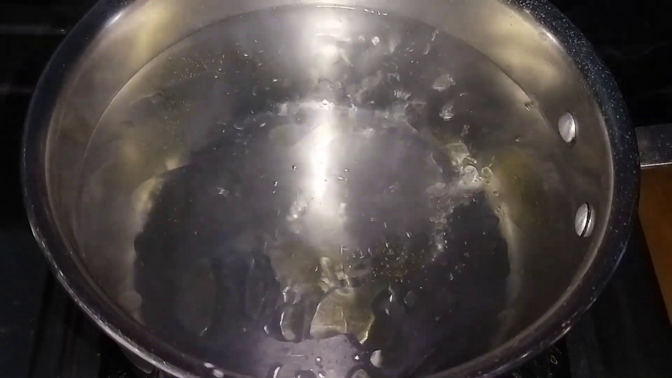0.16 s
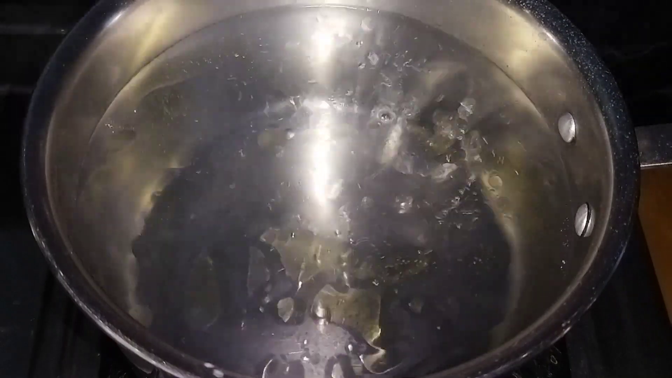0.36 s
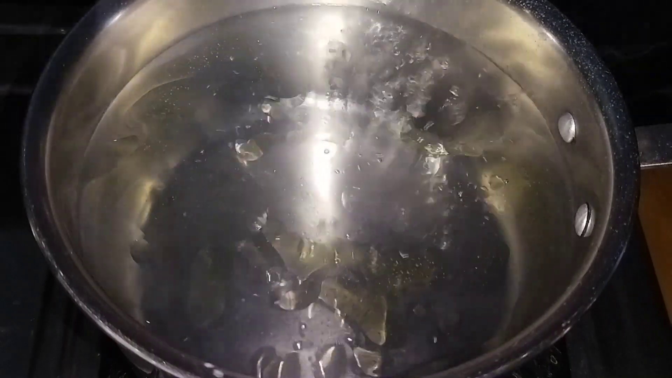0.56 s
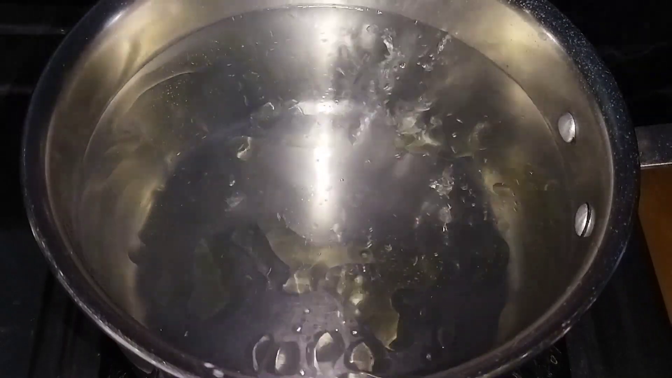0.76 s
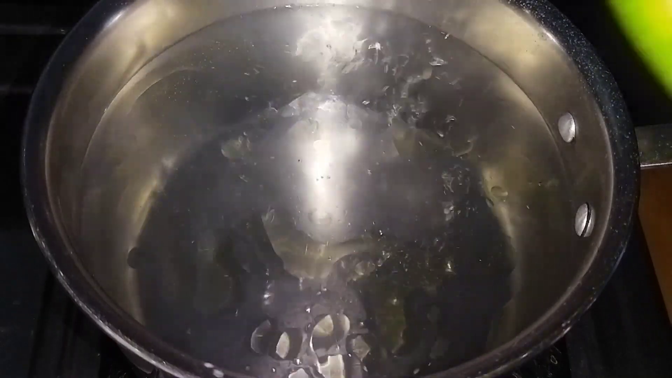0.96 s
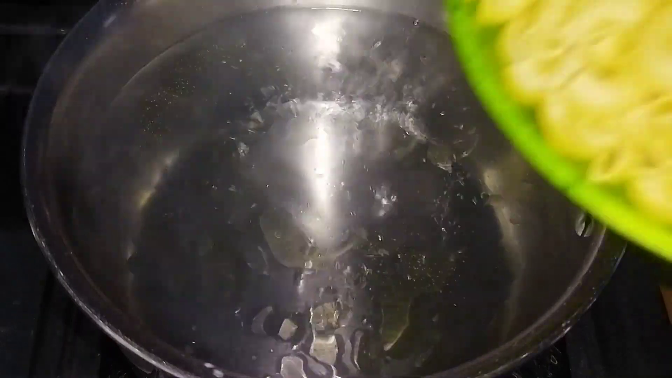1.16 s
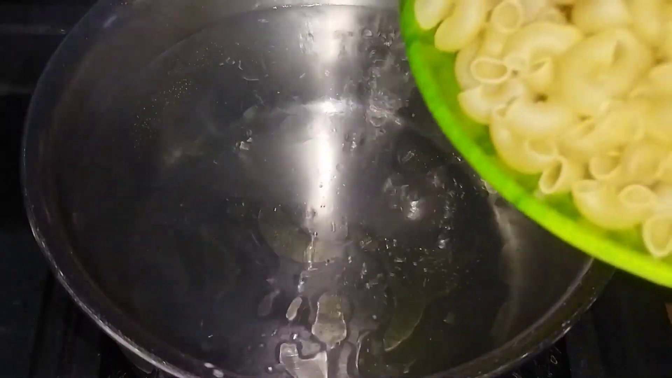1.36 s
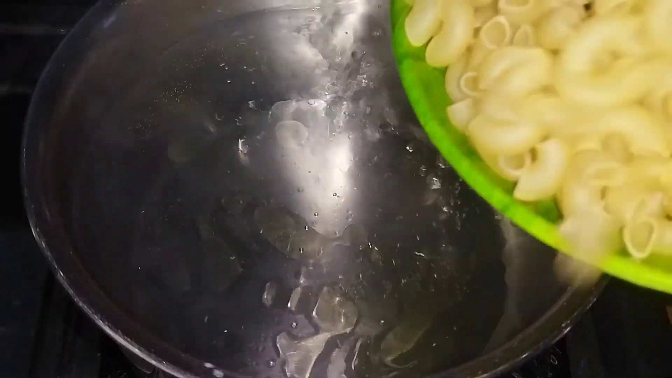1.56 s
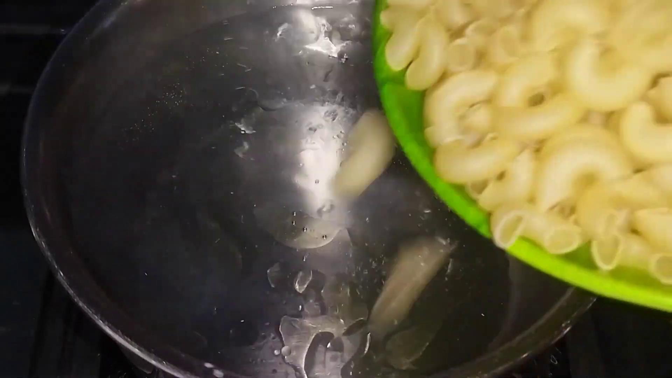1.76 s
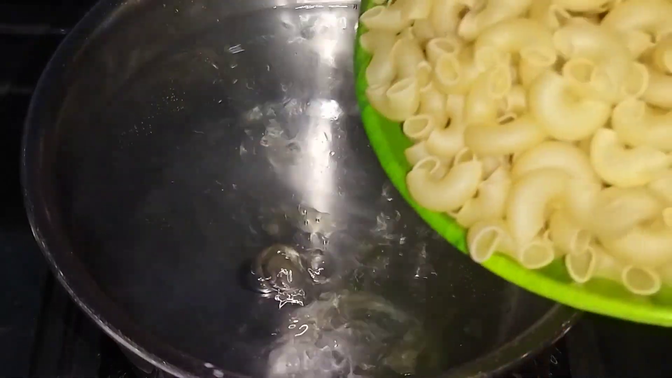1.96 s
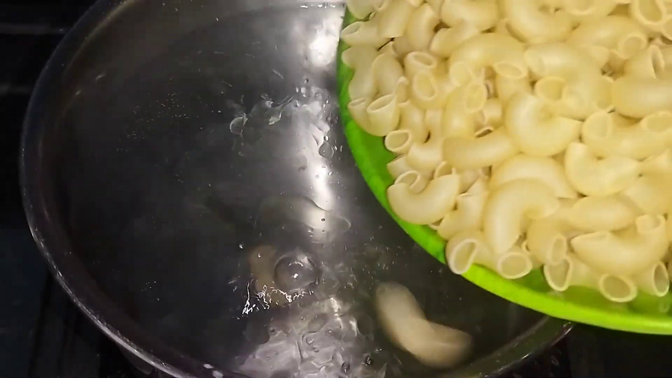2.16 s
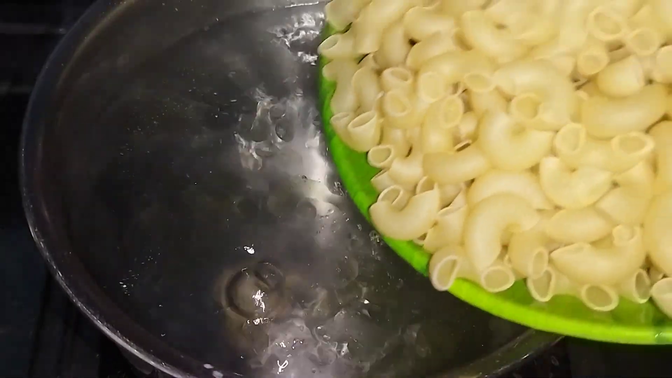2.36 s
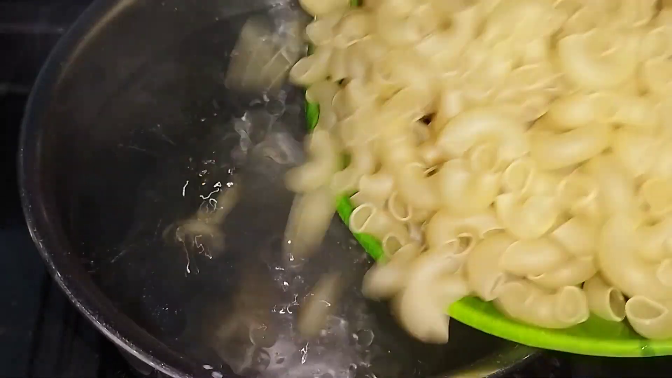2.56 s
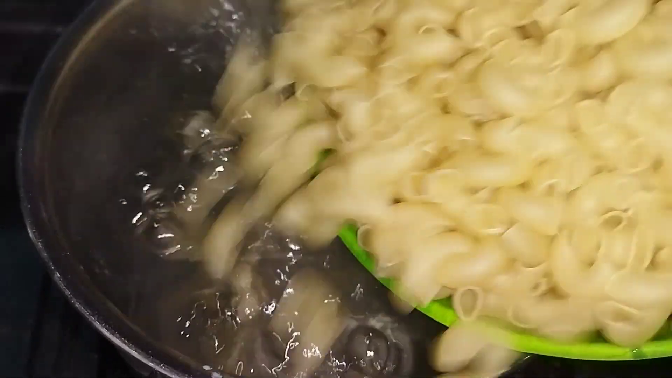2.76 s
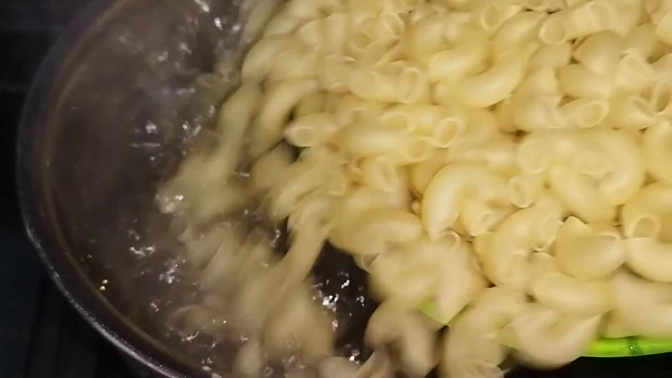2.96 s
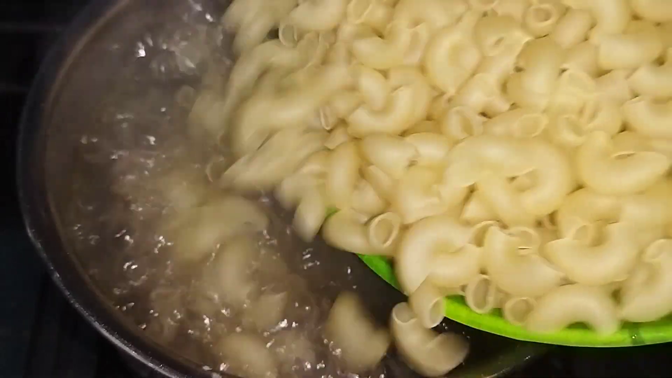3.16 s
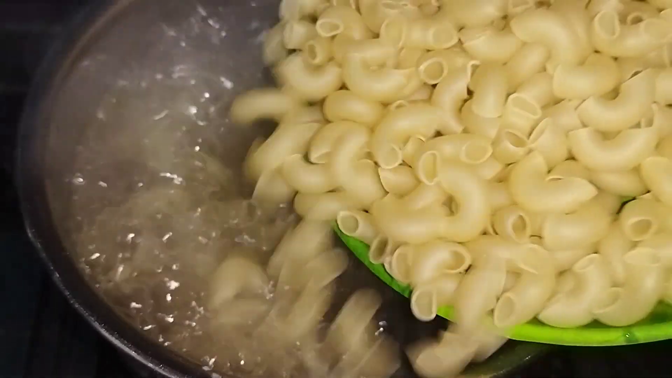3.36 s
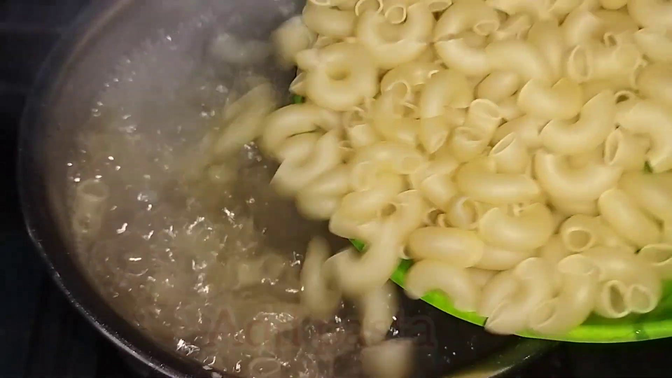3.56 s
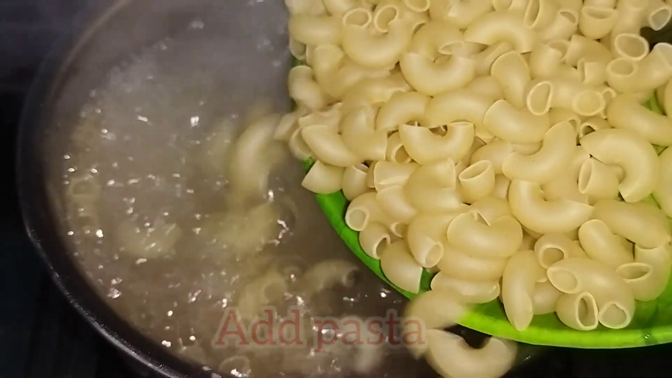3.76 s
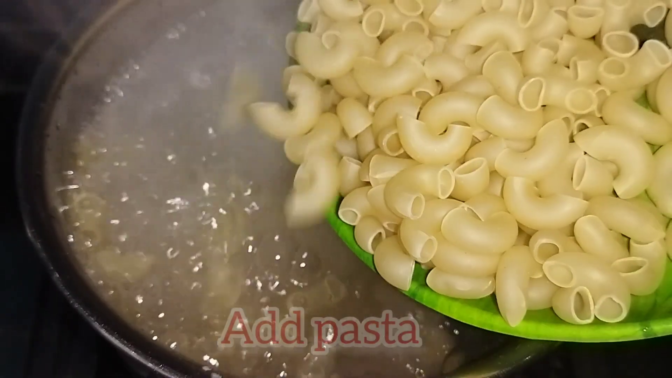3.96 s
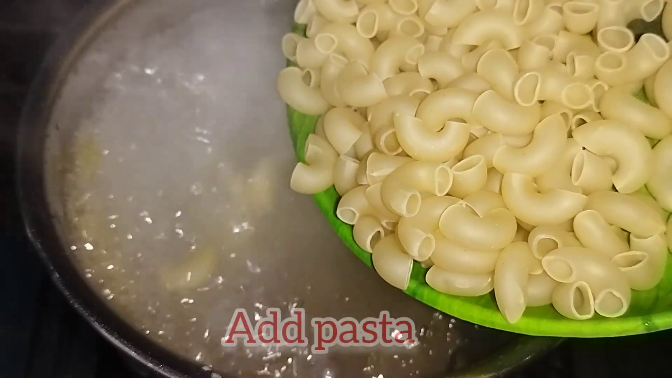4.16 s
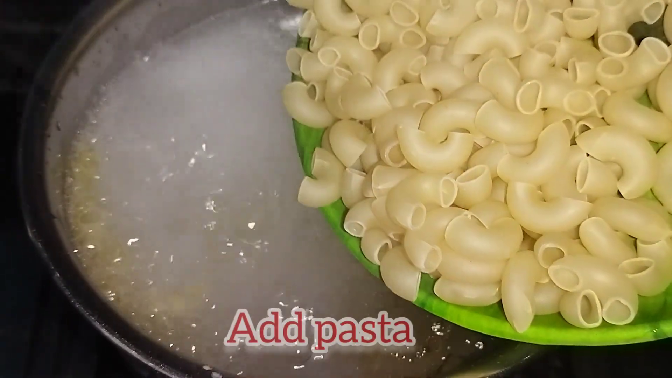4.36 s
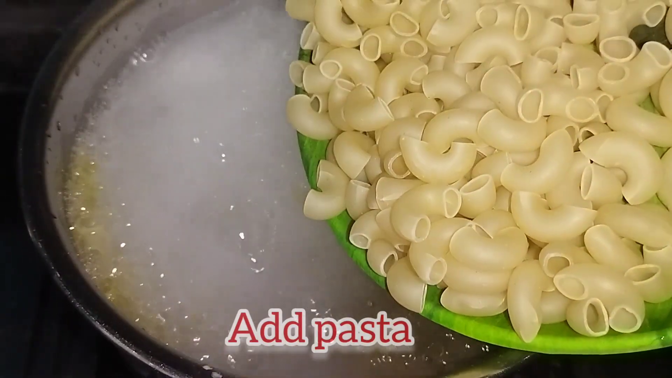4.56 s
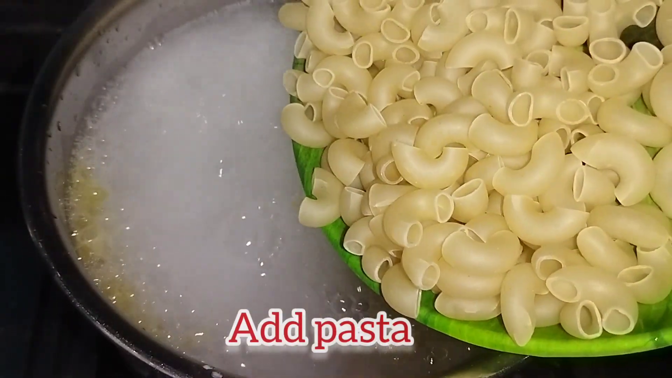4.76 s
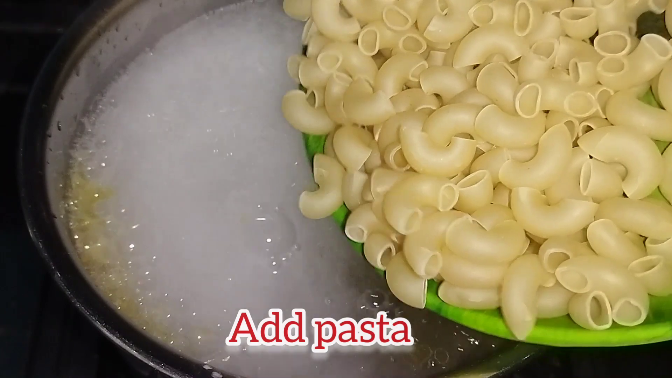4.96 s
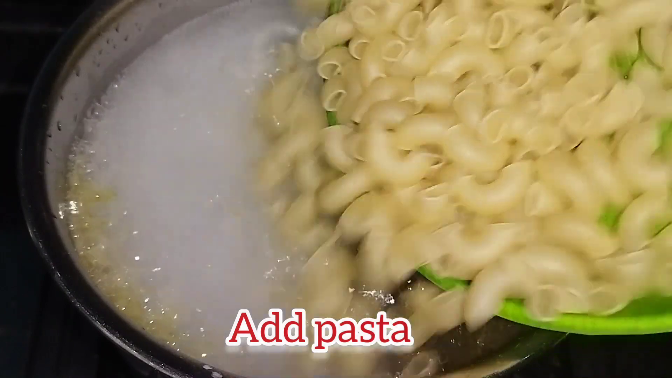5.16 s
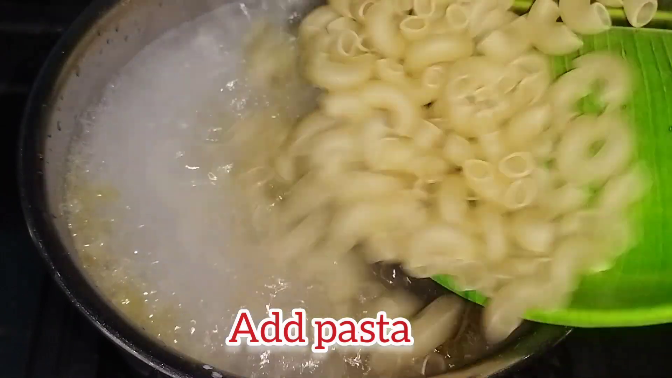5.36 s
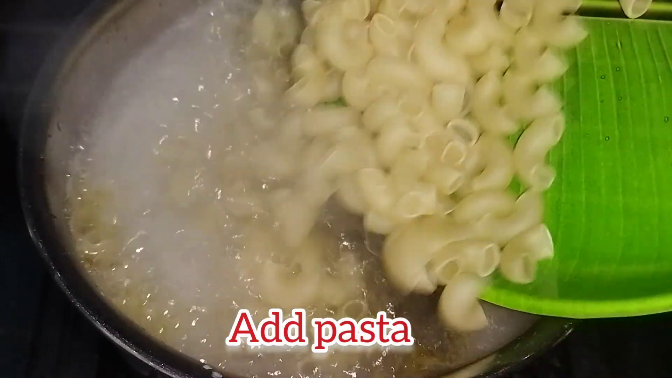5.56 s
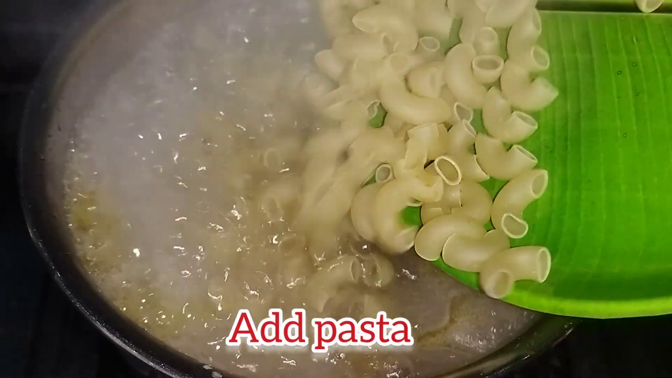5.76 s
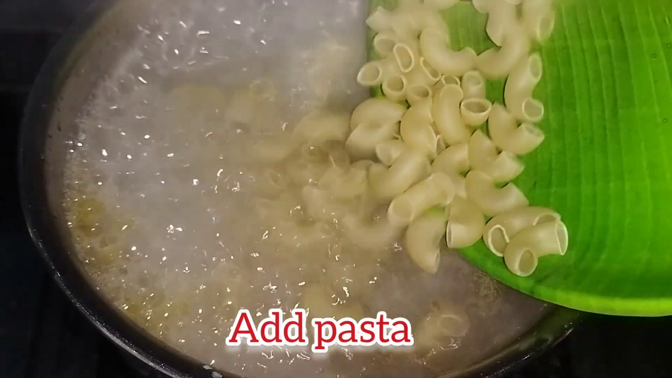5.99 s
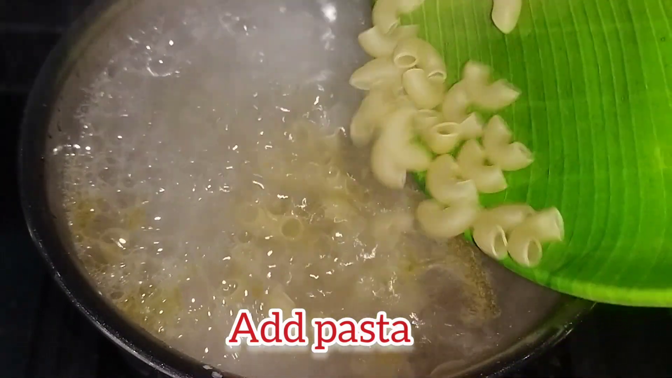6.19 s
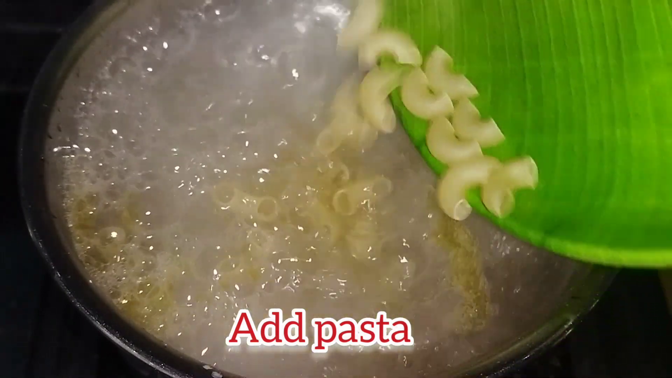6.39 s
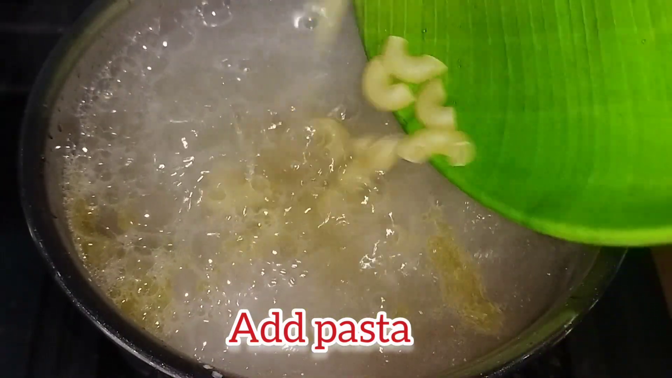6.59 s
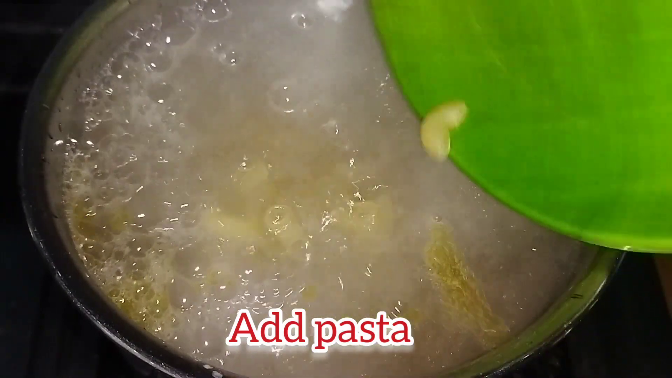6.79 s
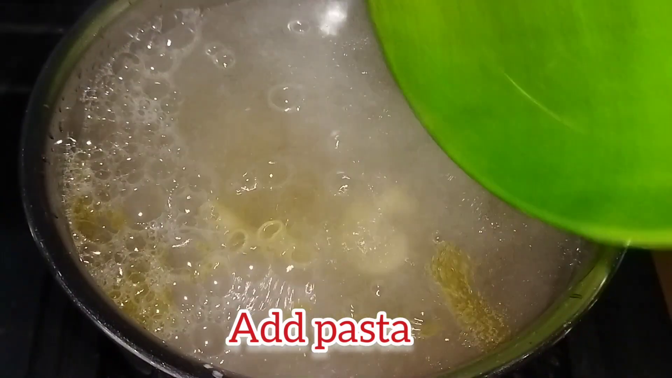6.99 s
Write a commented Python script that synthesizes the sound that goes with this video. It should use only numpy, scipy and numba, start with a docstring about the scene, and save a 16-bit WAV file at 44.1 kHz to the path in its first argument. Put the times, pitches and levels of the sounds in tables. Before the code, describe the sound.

Close stereo pickup in a small, hard-walled kitchen. A pot simmers with a low wavering hum and soft blips over quiet burner hiss. A few dry macaroni tick off a plastic plate, then a dense, bright clattering rush falls in with gurgling splashes. It pauses over fine foam fizz, a second rush follows, then last pieces tick and the plate gives a dull knock.

```python
"""In a kitchen, dry macaroni slides off a plastic plate into a steel pot of simmering water, in three bursts.
The hard tubes clatter, snap and tick by short damped modes and cracks; trapped air rings as rising bubbles.
The pot's hum, a wavering tone with narrow-band noise, and its churning die as the pasta cools the water.
Burner rumble and hiss are filtered noise, foam fizz is treble noise, a faint whistle fills a pause,
and low modes make a soft and then a stronger dull knock at the end."""
import sys
import numpy as np
from scipy import signal
from scipy.fft import rfft, irfft
from scipy.io import wavfile
from scipy.ndimage import uniform_filter1d
from numba import njit

SR = 44100
rng = np.random.default_rng(int(sys.argv[2]) if len(sys.argv) > 2 else 0)


def transcribe(signal):
    """Save signal, clipped to [-1, 1], as a 16-bit WAV file at the path in sys.argv[1]."""
    frames = np.atleast_2d(signal).T
    limited = np.clip(frames, -1, 1)
    pcm = np.round(limited * 32767).astype(np.int16)
    wavfile.write(sys.argv[1], SR, pcm)


N = 309839
T = np.arange(N) / SR  # s
TOP_HZ = 15500  # upper limit of the sound

# Levels in the tables are relative unless a comment says otherwise.
# Burner hiss spectrum: (f/Hz, spectral level/dB)
HISS_SPECTRUM = [(60, -8.5), (150, -13.5), (230, 3), (360, 0.5), (560, -11), (1100, -11), (2200, -25),
                 (4000, -33.5), (7500, -28), (9600, -15), (11200, -27), (15500, -38)]
HISS_DB = -56  # rms
# Burner rumble spectrum: (f/Hz, level/dB)
RUMBLE_SPECTRUM = [(25, -34), (45, -15), (63, -6.0), (78, -10.0), (104, 1.0), (160, -2.0), (260, -16.5),
                   (600, -45.0)]
# Flurries of steam bubbles: (t/s, level over the steady blipping/dB)
STEAM_FLURRIES = [(0.26, -4), (0.58, 4), (0.8, 2)]
FLURRY_S = 0.027
# Resonances of the churning water, each passed twice: (f/Hz, width per pass/Hz, level/dB)
CHURN_MODES = [(64, 63, -6), (118, 93, 4.5), (163.6, 20, 1.5), (346, 100, 3), (405, 204, -2)]
# Simmering noise: (f/Hz, spectral level/dB)
SIMMER_SPECTRUM = [(200, -26.5), (450, -9.5), (670, -24.5), (810, -15), (1050, -13), (1700, -12),
                   (3500, -19), (8000, -31)]
CHURN_DB = -49.5
QUENCH_S, QUENCH_DB_PER_S, QUENCH_DEPTH_DB = 4, 16, 25  # onset, rate and limit of the churn's decay
# Surges of the boiling hum: (t/s, level/dB)
HUM_SURGES = [(0, -60), (0.2, -40), (0.38, -51), (0.55, -47.5), (0.98, -53), (1.15, -49), (1.41, -40.5),
              (1.67, -60), (1.82, -44), (2.02, -48), (2.12, -46), (2.3, -54), (2.57, -50), (2.8, -54),
              (3.05, -46), (3.3, -44), (3.7, -46), (4.1, -58), (4.45, -78)]
BOIL_HZ = 283.8  # pitch about which the hum wavers
# Single sharp snaps: (t/s, peak level/dB, bass level/dB, treble level/dB, ring f/Hz)
SNAP_EVENTS = [(1.334, -30, -10, -12, 5220), (1.3615, -24.5, -23, -32, 2560),
               (1.407, -22.5, -16.5, -14, 2240), (1.438, -29.5, -22, -18, 2390),
               (1.469, -35, -32, -8, 9600), (1.492, -14, -29.5, -19, 9620), (1.603, -15.5, -23, -19, 3130),
               (1.668, -23.5, -26, -25, 9300), (1.676, -28, -28, -20, 4600), (1.687, -26, -28, -13, 4600),
               (1.707, -36, -29, -13, 3960), (1.726, -13.5, -40, -20, 4600),
               (1.7281, -12.5, -46, -21, 4830), (1.963, -23, -13, 4, 12400),
               (1.981, -11.5, -20.5, -23, 3360), (2.028, -8, -35, -12, 13800), (2.149, -20, -20, -15, 3250),
               (2.196, -25, -26, -28, 3400), (2.229, -8, -42, -5, 9320), (2.359, -26, -26, -17, 4500),
               (2.392, -21.5, -24, -18, 4700), (2.406, -18.5, -17, -13.5, 3370),
               (2.49, -18.5, -24, -18.5, 5370), (2.537, -22.5, -15, -14, 3250),
               (2.598, -19, -27, -23, 3430), (2.713, -24, -27, -22, 4800), (2.861, -15.5, -23, -23, 6560),
               (2.902, -16, -15, -11, 9200), (2.936, -8.5, -21.5, -7, 4400), (2.948, -13, -23, -28, 2440),
               (3.154, -15, -21, -20, 9600), (3.26, -13.5, -28, -9, 10700), (3.279, -11, -30, -11, 12400),
               (3.298, -5.5, -14, -10, 9700), (3.42, -13.5, -29, -9, 4380), (3.487, -11, -13, -7, 9800),
               (3.55, -7, -19.5, -8, 11160), (3.591, -11, -12, 8, 11600), (3.688, -8.5, -23, -13, 10200),
               (3.761, -10.5, -14, -6, 9500), (3.877, -9, -20, -10, 9080), (3.963, -16, -23, -25, 10000),
               (3.968, -12, -20.5, -15, 4570), (4.069, -24, -11, -15.5, 3060), (4.083, -26, -25, -17, 9600),
               (4.136, -27, -21, -16, 9700), (4.152, -12, -19, -12.5, 9750), (5.113, -23, -18, -32, 3800),
               (5.138, -22, -25, -17, 2610), (5.374, -24, -24, -23, 4600), (5.385, -9.5, -21, -15, 4550),
               (5.402, -18, -26, -18, 5270), (5.749, -13.5, -35, -14, 9770), (5.886, -18.5, -17, -7, 9400),
               (5.947, -15.5, -13, -12, 5300), (5.969, -23, -31, -17, 6670), (6.011, -21, -12, -21, 4470),
               (6.076, -20.5, -17, -9, 6550), (6.101, -21, -22, -15, 4960), (6.235, -25.5, -44, -24, 6230),
               (6.329, -16, -15, -11.5, 2680), (6.394, -25, -23, -18, 4360), (6.401, -26, -17, -19, 4370),
               (6.41, -15, -23, -17, 4420), (6.429, -26, -22, -22, 3040), (6.451, -19.5, -21.5, -22, 3530),
               (6.48, -26, -27, -12, 6440), (6.49, -15, -27, -15.5, 3500), (6.497, -16, -24, -12, 9450),
               (6.507, -21, -23, -14, 4630), (6.52, -13, -19, -4.5, 4520), (6.531, -14.5, -34, -5, 9840),
               (6.568, -16, -21, -19.5, 4360), (6.674, -27, -20, -14, 9340),
               (6.693, -5.5, -24.5, -5.5, 11820), (6.802, -26, -29, -20, 3970),
               (6.837, -28, -21, -20, 5230), (6.92, -23.5, -40, -1, 12000), (6.991, -15, -22, -12.5, 2140)]
# Partials of a ringing hollow tube: (multiple of its ring f, level/dB)
TUBE_MODES = [(1, 4), (1.33, -9), (2.15, -16)]
# Upper colouring of the snaps: (f/Hz, gain/dB)
SNAP_COLOUR = [(5000, -2.5), (5700, -4), (6600, 1), (7400, -4.5), (8300, 1.5), (9500, 4), (11200, -1.5),
               (11900, 1), (15000, -9)]
TUBE_T60_S = 0.015
SNAP_RISE_S = 0.0027  # the scuffle of a snap peaks this long after first touch
# Slides off the plate: (start t/s, swell time/s, ebb t/s, ebb rate/(dB/s), clatter level/dB,
#                        top octave level re clatter/dB, splash level re clatter/dB)
PASTA_SLIDES = [(1.36, 0.12, 1.9, 10.5, -45.5, -10, -9.5), (2.53, 0.19, 3.724, 44.5, -31, -1.5, -8),
                (4.93, 0.09, 5.52, 30, -41.5, -34, -27), (5.08, 0.067, 5.528, 21, -31, -3, -10.5),
                (6.38, 0.26, 6.75, 62, -42, 4, -3)]
SWELL_DB = 24  # a slide starts this far under its full level
HARDENING = 0.66  # extra dB of top octave per dB of flow: a fast stream collides harder
SPLASH_LAG_S, SPLASH_FOLLOW = 0.062, 0.76  # the fall to the water; dB of splash per dB of flow
# Spectrum of the sliding heap: (f/Hz, gain/dB)
HEAP_COLOUR = [(410, -35), (700, -2.5), (818, -0.5), (1060, -1), (1360, -0.5), (1780, 2), (2400, 0.5),
               (3350, 1), (4580, -0.5), (5000, -2.5), (5640, -5.5), (6590, -3), (7700, -11), (9470, 3.5),
               (11350, -6.5), (11850, 0), (12900, -6.5), (15500, -9.5)]
# Clumps that tumble at once: (t/s, level/dB)
TUMBLING_CLUMPS = [(1.732, -42), (1.985, -28.5), (2.717, -29), (2.803, -30), (2.944, -38), (3.024, -34.5),
                   (3.303, -22), (3.353, -19), (3.488, -32), (3.552, -26.5), (5.162, -34), (5.22, -40),
                   (5.699, -44), (6.497, -40)]
CLUMP_DECAY_S = 0.017  # time constant
# Spectrum of loose pieces: (f/Hz, gain/dB)
STRAY_COLOUR = [(400, -24), (1500, 9), (4000, -11), (7500, -4.0), (9500, 4), (15000, -5)]
# Spectrum of the splash: (f/Hz, gain/dB)
SPLASH_COLOUR = [(100, -17.0), (160, -6), (220, -11), (310, -0.5), (430, -0.5), (560, -1.5), (680, -4.5),
                 (880, 3.5), (1300, -5.5), (1800, -4)]
# Resonances of the pot's air and walls: (f/Hz, level/dB)
POT_RESONANCES = [(437, -1), (749, -6.5), (887, -9), (1168, -5), (1756, -6), (2743, -2), (4570, -6),
                  (6349, -3), (9380, -9)]
FOAM_START_S, FOAM_RISE_S = 1.5, 4.2  # starch foam spreads over the water
# Spectrum of the foam's fizz: (f/Hz, level/dB)
FIZZ_SPECTRUM = [(1000, -50), (7500, -16), (9500, -0.5), (11200, -11), (12200, -3.5), (15500, -12)]
# Modes of the steel wall: (f/Hz, level/dB, t60/s)
WALL_MODES = [(3320, -3, 0.053), (4568, 0.5, 0.064), (5000, 0, 0.091), (5380, -4, 0.08), (9537, 4, 0.046)]
# Pieces that strike the steel wall: (t/s, level/dB)
WALL_HITS = [(1.730, -23.5), (2.031, -42), (2.938, -29), (5.387, -34)]
# Single larger bubbles: (t/s, level/dB, starting f/Hz)
PLOP_EVENTS = [(2.419, -34.5, 840), (2.68, -35, 890), (2.71, -29.5, 776), (2.783, -25.5, 1080),
               (4.232, -31.5, 1740), (4.319, -35, 1060), (6.421, -37, 1080), (6.631, -36, 1130),
               (6.712, -38, 970), (6.752, -39, 1110)]
# Low modes of the plate: (f/Hz, level/dB, t60/s)
PLATE_MODES = [(111, -37, 0.15), (151, -28, 0.017), (204, -34, 0.22), (282, -18, 0.021), (397, -33, 0.11),
               (591, -23, 0.03), (820, -28.5, 0.047), (2200, -21.5, 0.011)]
# Dull knocks: (t/s, level/dB)
PLATE_KNOCKS = [(6.693, -14), (6.991, 1.5)]
# Reverberation time of the kitchen: (f/Hz, t60/s)
REVERBERATION = [(200, 0.83), (1500, 0.33), (5000, 0.29), (10000, 0.27), (15000, 0.29)]
# Level of the difference between the two ports: (f/Hz, gain/dB)
PORT_DIFFERENCE = [(350, -14.5), (800, -3.0), (2000, -0.5)]
# Response of each port: (f/Hz, gain/dB)
LEFT_PORT = [(200, -2.5), (2000, 0.48), (5000, 2.0), (8800, 3.0), (12000, 4.0)]
RIGHT_PORT = [(200, -3.0), (2000, -0.1), (5000, 1.4), (8800, -3.5), (12000, 3.5)]


def undb(db):
    """Amplitude ratio of a level difference in decibels."""
    return 10 ** (np.asarray(db) / 20)


def level(x, db):
    """Normalization: scale a signal to a given rms level."""
    return x * undb(db) / np.sqrt(np.mean(x ** 2))


def on_log_axis(points, hz):
    """Interpolation on a logarithmic frequency axis, as hearing spaces pitch."""
    f, value = np.transpose(points)
    return np.interp(np.log(hz + 1), np.log(f), value)


def colour(x, points, size=4096):
    """Minimum-phase filtering: a folded cepstrum makes the response to (f/Hz, gain/dB) points causal."""
    gain_db = on_log_axis(points, np.fft.rfftfreq(size, 1 / SR))
    cepstrum = irfft(np.log(undb(gain_db)))
    fold = 1 + np.sign(size / 2 - np.arange(size))
    fold[0] = 1
    response = irfft(np.exp(rfft(cepstrum * fold)))
    return signal.fftconvolve(x, response[None], axes=1)[:, :x.shape[1]]


def resonate(x, hz, width_hz):
    """Resonance: a single mode passes its own frequency with unit gain."""
    return signal.lfilter(*signal.iirpeak(hz, hz / width_hz, fs=SR), x)


def walk(rate):
    """Slow random fluctuation: smoothed random steps, rate per second, with a spread near 1."""
    k = int(SR / rate)
    steps = np.repeat(rng.standard_normal(N // k + 1), k)
    return uniform_filter1d(steps, k)[:N]


def air_noise(size=N):
    """Spatial coherence: stereo noise is alike in the bass and nearly unrelated in the treble."""
    mid, side = rng.standard_normal((2, 1, size))
    return mid + np.array([[1], [-1]]) * colour(side, PORT_DIFFERENCE)


def add(out, s, sound):
    """Superposition: mix a short stereo sound in at time s."""
    i = int(s * SR)
    out[:, i:i + sound.shape[1]] += sound[:, :N - i]


@njit
def rings(s, hz, t60, size, glide, spread):
    """Damped oscillation: sines rise by the share glide as they die, spread radians apart at the ports."""
    out = np.zeros((2, N))
    for k in range(len(s)):
        start, length, phase = int(s[k] * SR), int(t60[k] * SR), 0.
        for i in range(min(length, N - start)):
            age = i / length
            phase += 2 * np.pi * hz[k] * (1 + glide * age) / SR
            onset = min(1., i * hz[k] / SR * 2)  # half a cycle
            a = size[k] * np.exp(-6.9 * age) * onset
            out[0, start + i] += a * np.sin(phase + spread[k] / 2)
            out[1, start + i] += a * np.sin(phase - spread[k] / 2)
    return out


def stove(rumble_db=-54.0):
    """Broadband noise: the burner's hiss is steady and its low rumble fluctuates slightly."""
    rumble = colour(air_noise(), RUMBLE_SPECTRUM)
    hiss = level(colour(air_noise(), HISS_SPECTRUM), HISS_DB)
    return hiss + level(rumble, rumble_db) * undb(1.5 * walk(14))


def blips(count=420, centre_hz=805, spread=0.019, cycles=40, scatter_db=0.0):
    """Bubble resonance: small steam bubbles burst singly near one pitch, now and then in a flurry."""
    when, strength = rng.random((count, 2)).T
    hz = centre_hz * np.exp(spread * rng.standard_normal(count))
    size = undb(scatter_db * np.minimum(-np.log(1 - strength), 2))
    pops = rings(when * N / SR, hz, cycles / hz, size, 0.022, hz / 1500)
    flurries = sum(undb(db) * np.exp(-((T - s) / FLURRY_S) ** 2) for s, db in STEAM_FLURRIES)
    return pops * (1 + flurries)


def boil(blip_db=-10, simmer_db=-56.5, quenched_s=5.52):
    """Noise-driven resonance: the water churns, blips and simmers until the pasta cools it."""
    boil_db = CHURN_DB - np.clip(QUENCH_DB_PER_S * (T - QUENCH_S), 0, QUENCH_DEPTH_DB)
    drive = air_noise()
    churn = sum(undb(db) * resonate(resonate(drive, hz, width), hz, width) for hz, width, db in CHURN_MODES)
    simmer = colour(air_noise() * undb(1.8 * walk(60)), SIMMER_SPECTRUM)
    boiling = (level(churn, 0) + level(blips(), blip_db)) * undb(boil_db)
    simmer_fade = np.clip(quenched_s - T, 0, 1)  # over the last second before quenched_s
    return boiling + level(simmer, simmer_db) * simmer_fade


def hum(waver_hz=3.42, waver_rate=14, flutter_db=1.0, flutter_rate=22, rough_db=-7, rough_width_hz=22,
        trim_db=-1):
    """Sustained resonance: collapsing steam bubbles keep one low, wavering note of the pot sounding."""
    phase = 2 * np.pi * np.cumsum(BOIL_HZ + waver_hz * walk(waver_rate)) / SR
    rough = resonate(resonate(air_noise(), BOIL_HZ, rough_width_hz), BOIL_HZ, rough_width_hz)
    note = level(np.sin(phase), trim_db) + level(rough, rough_db)
    surge_db = np.interp(T, *np.transpose(HUM_SURGES))
    return note * undb(surge_db + flutter_db * walk(flutter_rate))


def snaps(crack_db=3, crack_s=0.0012, crack_decay_s=0.0002, ring_db=-3, bass_db=11.0, middle_db=-10,
          treble_db=-2, trim_db=-6.0, pan_db=-1.0, size=3072):
    """Impact excitation: a crack inside a very short scuffle, then the hollow piece rings at its own pitch."""
    out, t = np.zeros((2, N)), np.arange(size) / SR
    scuffle = (t / SNAP_RISE_S) ** 2 * np.exp(2 - 2 * t / SNAP_RISE_S)
    since = np.maximum(t - crack_s, 0)
    crack = (t > crack_s) * np.exp(-since / crack_decay_s)
    fade = (t > crack_s) * np.exp(-np.log(1000) * since / TUBE_T60_S)
    loudest = lambda x: np.sqrt(uniform_filter1d(np.mean(x ** 2, axis=0), size=132).max())  # 3 ms rms
    pan = np.array([[pan_db], [-pan_db]]) / 2
    for s, db, low_db, high_db, hz in SNAP_EVENTS:
        low, high = bass_db + low_db, treble_db + high_db
        burst = air_noise(size) * (scuffle + undb(crack_db) * crack)
        burst = colour(burst, [(60, low - 30), (300, low - 6.5), (1500, low), (4600, middle_db), (12000, high)])
        tube = sum(undb(part_db) * (hz * ratio < TOP_HZ)
                   * np.sin(2 * np.pi * (hz * ratio * t + rng.random((2, 1))))
                   for ratio, part_db in TUBE_MODES)
        snap = burst / loudest(burst) + undb(ring_db) * tube * fade
        add(out, s, snap / loudest(snap) * undb(db + trim_db + pan))
    return out


def slides():
    """Granular flow: clatter, top octave and splash levels in dB follow the pasta, the splash later."""
    power = np.zeros((3, N))
    for start, swell_s, ebb, ebb_db_per_s, db, top_db, splash_db in PASTA_SLIDES:
        swell = -SWELL_DB * np.exp(np.minimum((start - T) / swell_s, 2))
        flow_db = swell - ebb_db_per_s * np.maximum(T - ebb, 0)
        landing_db = np.interp(T - SPLASH_LAG_S, T, flow_db)
        bright_db = top_db + (1 + HARDENING) * flow_db
        wet_db = splash_db + SPLASH_FOLLOW * landing_db
        power += undb(db + np.array([flow_db, bright_db, wet_db])) ** 2
    return 10 * np.log10(power)


def collisions(count=10500, order=4, scatter_db=4.0):
    """Modal excitation: each contact rings a few short modes of a hard tube, damped by the heap around it."""
    when, strength = np.repeat(rng.random((count, 2)), order, axis=0).T
    pitch, damping, side = rng.random((count * order, 3)).T
    size = undb(scatter_db * np.minimum(-np.log(1 - strength), 3.5))
    hz, t60 = 400 + 15600 * pitch, .005 + .016 * damping
    # long waves reach both ports nearly in step
    spread = 2 * np.pi * (side - .5) * np.minimum(hz / 1900, 1)
    return rings(when * N / SR, hz, t60, size, 0., spread)


def scraping(grip_db=3.0, grip_rate=700):
    """Stick-slip friction: rubbing pieces catch and slip so fast that it fuses into a rush."""
    return air_noise() * undb(grip_db * walk(grip_rate))


def cracks(count=420, scatter_db=2.0, decay_s=0.0026, size=400):
    """Impulsive contact: two edges meet squarely with a dry broadband crack."""
    out, fade = np.zeros((2, N)), np.exp(-np.arange(size) / SR / decay_s)
    for when, strength in rng.random((count, 2)):
        gain = undb(scatter_db * min(-np.log(1 - strength), 2))
        add(out, when * N / SR, rng.standard_normal((2, size)) * fade * gain)
    return out


def clatter(clatter_db, bright_db, trim_db=1, top_db=-1.5, crack_db=-5, surge_db=2.0, surge_rate=90,
            clump_top_db=-7, scrape_db=-5):
    """Superposed impacts: contacts, scraping and cracks come in small surges, with denser tumbling clumps."""
    contacts = level(level(collisions(), 0) + level(scraping(), scrape_db), 0)
    ticks = colour(contacts + level(cracks(), crack_db), HEAP_COLOUR) * undb(surge_db * walk(surge_rate))
    # the same contacts half the scene away make the crowd denser
    crowd = colour(contacts + np.roll(contacts, N // 2, axis=1), HEAP_COLOUR)
    clumps = sum(undb(db) * (T > s) * np.exp(-np.abs(T - s) / CLUMP_DECAY_S) for s, db in TUMBLING_CLUMPS)
    split = lambda x, kind: level(signal.sosfilt(signal.butter(4, 7600, kind, fs=SR, output="sos"), x), 0)
    body = split(ticks, "low") * undb(clatter_db) + split(crowd, "low") * clumps
    # dry pieces striking each other hard add the top octave
    edge = split(ticks, "high") * undb(bright_db) + split(crowd, "high") * clumps * undb(clump_top_db)
    return body * undb(trim_db) + edge * undb(top_db)


def strays(clatter_db, trim_db=-8, most_db=-43):
    """Masking: loose pieces tick on their own, capped in level so they stand out where the stream is thin."""
    ticks = cracks(count=200, scatter_db=6.5, decay_s=0.00041)
    ticks = colour(ticks, STRAY_COLOUR)
    return level(ticks, trim_db) * undb(np.minimum(clatter_db, most_db))


def bubbles(splash_db, count=4500, low_hz=160, high_hz=2400, scatter_db=5.0, trim_db=0):
    """Bubble resonance: pieces entering the water trap air, and each bubble rings and rises in pitch."""
    when, bore, strength, side = rng.random((count, 4)).T
    hz = low_hz * (high_hz / low_hz) ** bore
    size = undb(scatter_db * np.minimum(-np.log(1 - strength), 3.5)) * np.sqrt(hz / low_hz)
    water = rings(when * N / SR, hz, 14 / hz, size, .12, (side - .5) * hz / 500)
    return level(colour(water, SPLASH_COLOUR), trim_db) * undb(splash_db)


def foam_cover():
    """Surface coverage: share of the water under foam, 0 to 1."""
    return np.clip((T - FOAM_START_S) / FOAM_RISE_S, 0, 1)


def under_foam(water, edge_hz=300, open_db=8, covered_db=-3):
    """Surface damping: the deep gurgle of the splash fades as foam covers the water."""
    deep = signal.sosfiltfilt(signal.butter(2, edge_hz, fs=SR, output="sos"), water)
    deep_db = open_db + (covered_db - open_db) * foam_cover()
    return water + deep * (undb(deep_db) - 1)


def pot(x, width_hz=30, width_share=0.008, ring_db=-3):
    """Forced resonance: what falls in rings the pot a little; the higher resonances are broader."""
    return x + sum(undb(db + ring_db) * resonate(x, hz, width_hz + width_share * hz)
                   for hz, db in POT_RESONANCES)


def foam(fizz_db=-54.0):
    """Fluctuating noise: starchy foam rises and fizzes finely."""
    fizz = colour(air_noise() * undb(1.0 * walk(510)), FIZZ_SPECTRUM)
    return level(fizz, fizz_db) * foam_cover()


def rim_pings():
    """Free vibration: a piece that hits the steel wall rings its modes briefly."""
    hz, mode_db, t60 = np.array(WALL_MODES, float).T.copy()
    return sum(rings(np.full(len(hz), s), hz, t60, undb(db + mode_db), 0., hz / 4000) for s, db in WALL_HITS)


def plops(cycles=18, trim_db=7):
    """Bubble resonance: a few larger bubbles stand out, each rising in pitch."""
    s, db, hz = np.array(PLOP_EVENTS, float).T.copy()
    return rings(s, hz, cycles / hz, undb(db + trim_db), 0.19, hz / 1500)


def singing(tone_db=-66, skirt_db=-3, flicker_db=1.0, flicker_rate=25):
    """Narrow-band noise: a faint, airy and broken whistle is heard in a pause of the clatter."""
    drive = air_noise()
    tone = resonate(drive, 3252, 35) + undb(-5) * resonate(drive, 3698, 35)
    skirt = resonate(resonate(air_noise(), 3230, 220), 3230, 220)
    whistle = (level(tone, 0) + level(skirt, skirt_db)) * undb(flicker_db * walk(flicker_rate))
    pause = np.clip(10 * np.minimum(T - 4.4, 4.95 - T), 0, 1)  # 0.1 s fades
    return level(whistle, tone_db) * pause


def knocks():
    """Free vibration: dull knocks ring the low modes of the plate."""
    hz, mode_db, t60 = np.array(PLATE_MODES, float).T.copy()
    return sum(rings(np.full(len(hz), s), hz, t60, undb(db + mode_db), 0., hz / 2000) for s, db in PLATE_KNOCKS)


def kitchen(x, wet_db=-2.5, gap_s=0.0055, build_s=0.00022, size=26000):
    """Reverberation: hard walls return a diffuse tail that lasts longest in the bass."""
    t, hz = np.arange(size) / SR, np.fft.rfftfreq(size, 1 / SR)
    noise, tail = rfft(air_noise(size)), 0
    centres, t60s = np.transpose(REVERBERATION)
    # each band of the noise decays at its own rate
    for share, t60 in zip(np.eye(len(centres)), t60s):
        band = irfft(noise * on_log_axis(np.c_[centres, share], hz))
        tail = tail + band * np.exp(-np.log(1000) * t / t60)
    tail = tail * (1 - np.exp(-np.maximum(t - gap_s, 0) / build_s))
    return x + signal.fftconvolve(x, level(tail, wet_db) / np.sqrt(size), axes=1)[:, :N]


def scene():
    """Superposition: pasta, water and pot in the kitchen, over the boil and the burner."""
    clatter_db, bright_db, splash_db = slides()
    splash = under_foam(bubbles(splash_db))
    stream = pot(clatter(clatter_db, bright_db) + splash) + knocks()
    single_pieces = colour(snaps(), SNAP_COLOUR) + strays(clatter_db) + rim_pings()
    near = kitchen(stream, wet_db=-4.0) + kitchen(single_pieces, wet_db=-6.0, gap_s=0.0073)
    return near + plops() + hum() + boil() + foam() + stove() + singing()


def record(dry):
    """Receiver response: the left port is brighter near 9 kHz, and a steep low-pass cuts the top."""
    left = colour(dry[:1], LEFT_PORT)
    right = colour(dry[1:], RIGHT_PORT)
    top_cut = signal.ellip(8, .2, 70, TOP_HZ, fs=SR, output="sos")
    return signal.sosfilt(top_cut, np.vstack([left, right]))


dry = scene()
out = record(dry)
transcribe(out)
```